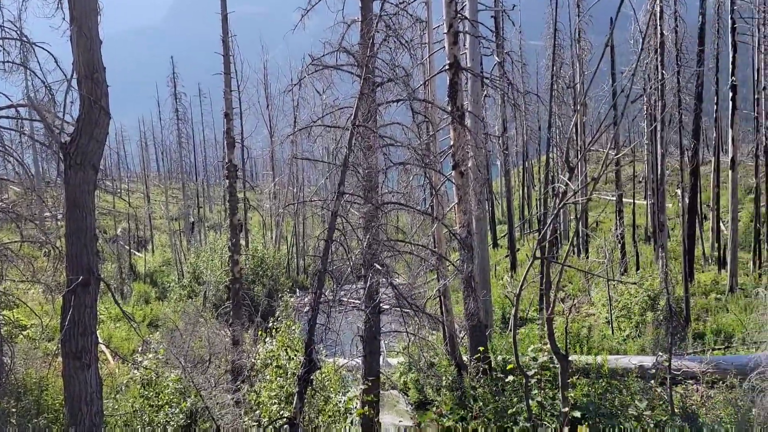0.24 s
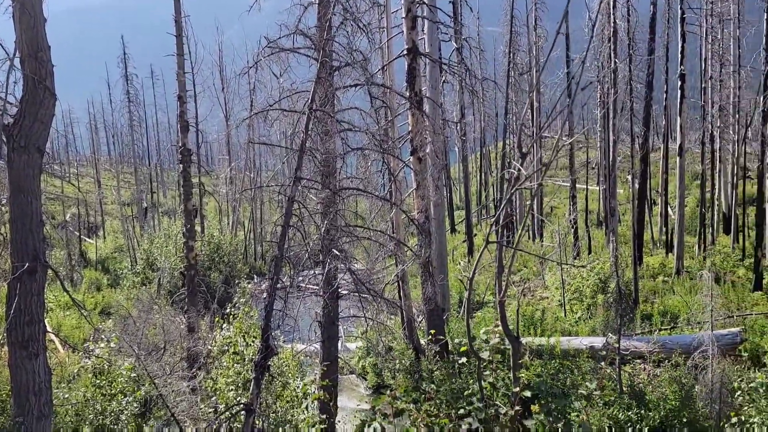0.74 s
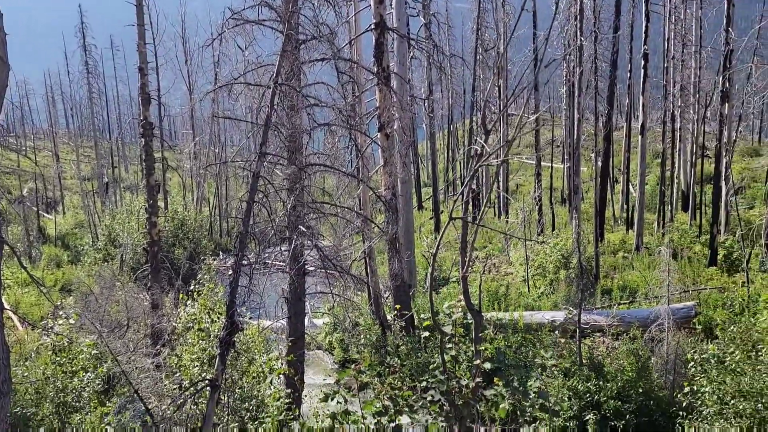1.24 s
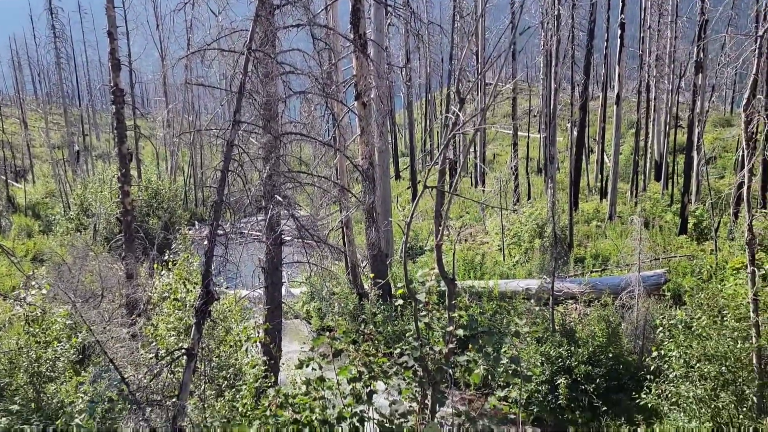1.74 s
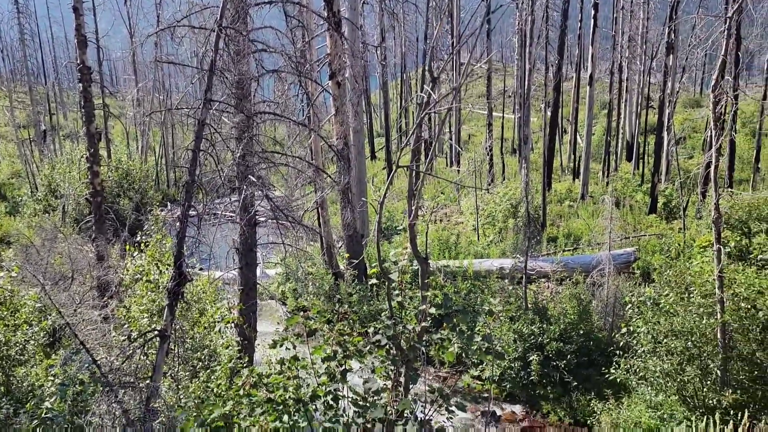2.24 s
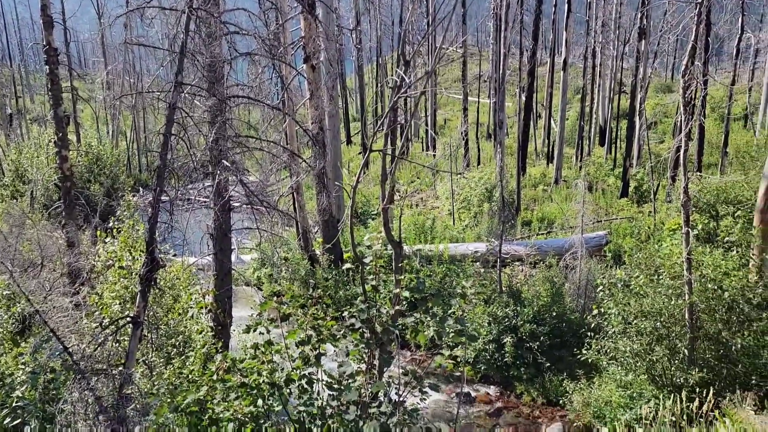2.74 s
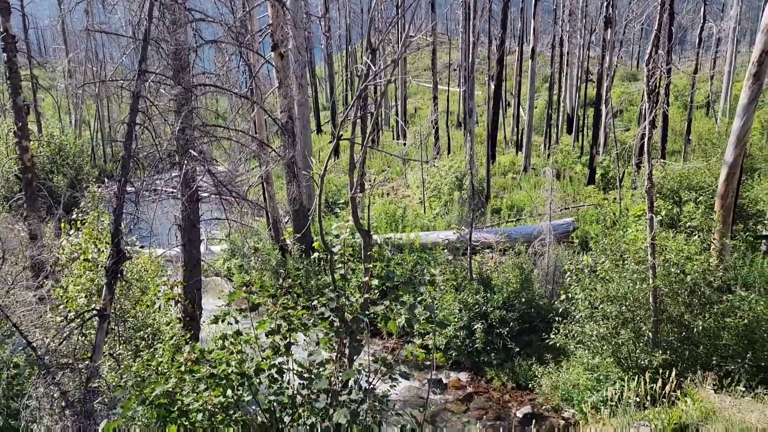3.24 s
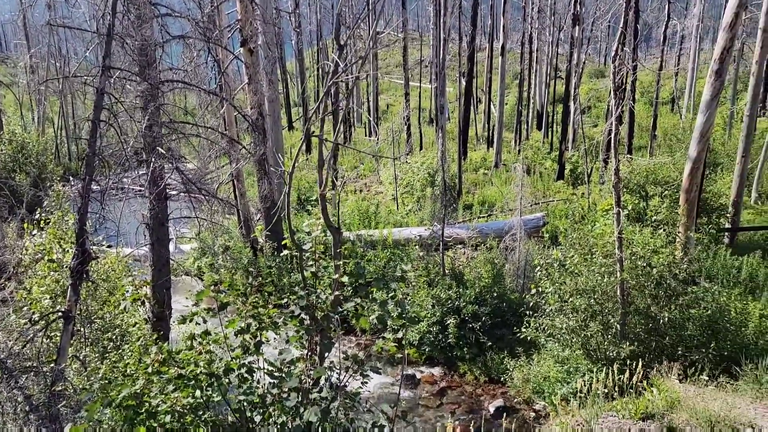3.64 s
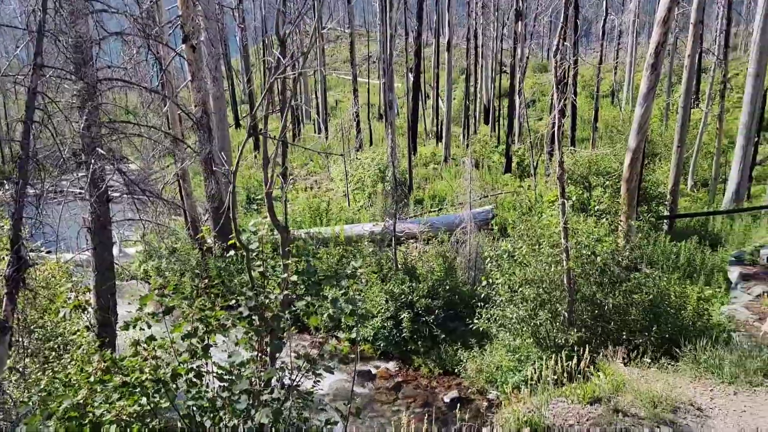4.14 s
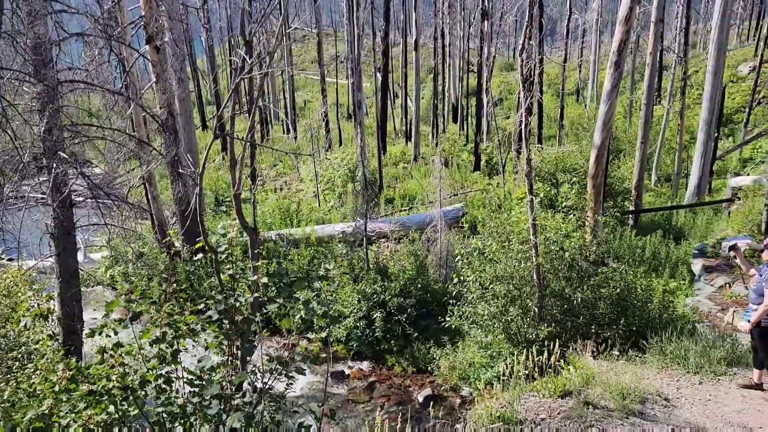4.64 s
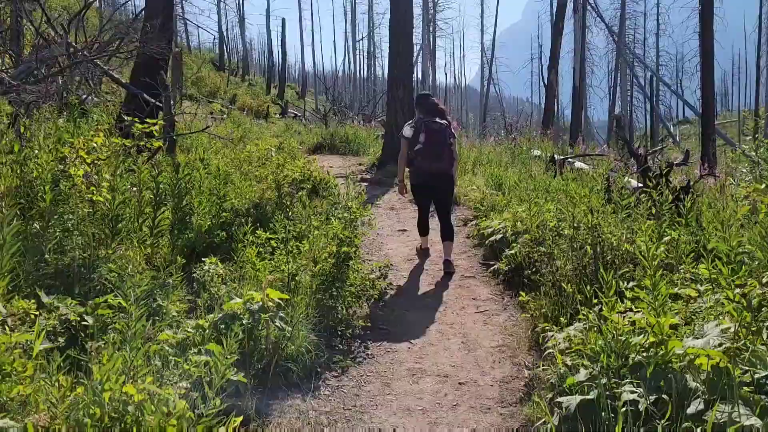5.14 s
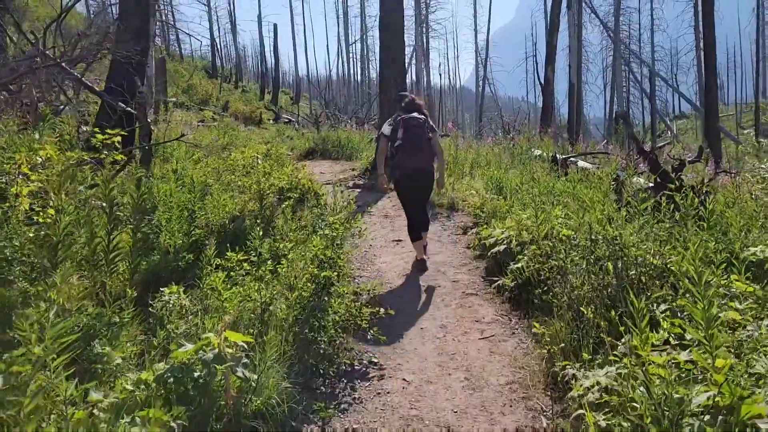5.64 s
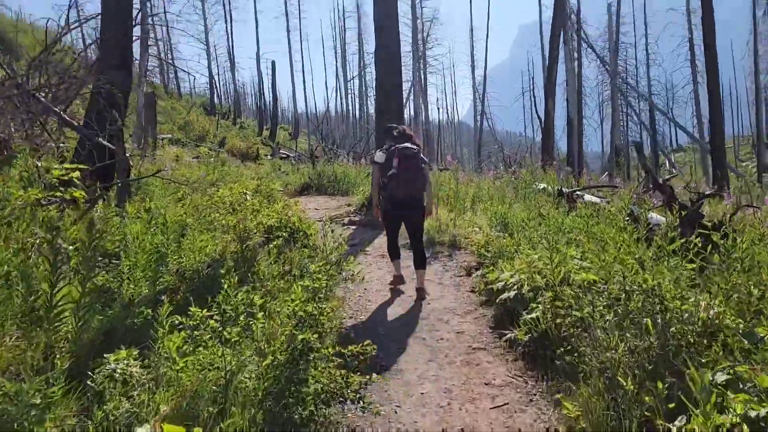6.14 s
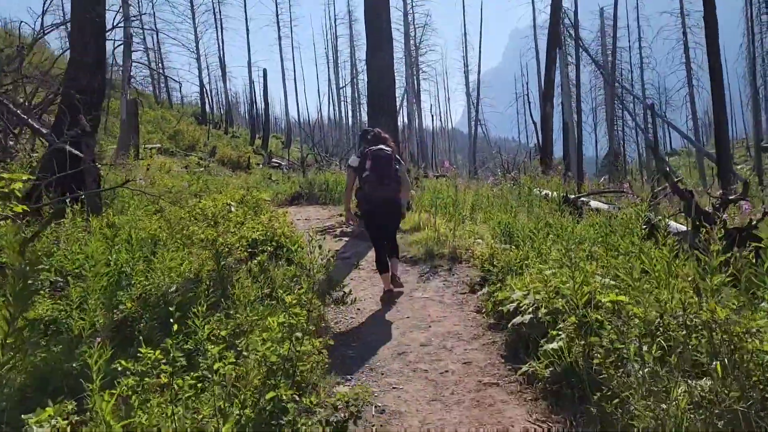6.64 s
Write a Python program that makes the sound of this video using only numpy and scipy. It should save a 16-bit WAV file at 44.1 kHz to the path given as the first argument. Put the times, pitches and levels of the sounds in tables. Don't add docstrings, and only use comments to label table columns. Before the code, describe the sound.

Outdoors, a rushing creek a few steps away fills both sides with steady churning hiss and small bubbling, over a heaving low rumble. Wind puffs buffet the handheld stereo microphone, strongest around three to four seconds. Just after five seconds it cuts to a tiny silence, then a much quieter trail: distant water, soft thumping treads, brushed leaves, dry grit cracks, a short scuff and two high insect buzzes.

```python
import sys
import numpy as np
from scipy import signal
from scipy.fft import rfft, irfft
from scipy.io import wavfile
from scipy.ndimage import uniform_filter1d

SR = 44100
rng = np.random.default_rng(int(sys.argv[2]) if len(sys.argv) > 2 else 0)


def generate_wav(sig):
    pcm = np.round(np.clip(np.atleast_2d(sig).T, -1, 1) * 32767).astype(np.int16)
    wavfile.write(sys.argv[1], SR, pcm)


def boost_factor(decibels):
    exponent = np.asarray(decibels, float) / 20
    return 10 ** exponent


N = 302967
T = np.arange(N) / SR
CREEK_END, TRAIL_START = 5.1695, 5.2203


def evened(x):
    return x / np.sqrt(np.mean(abs(x) ** 2) + 1e-20)


def read(rows, hz):
    f, *columns = np.transpose(rows)
    return [np.interp(np.log(hz + 1), np.log(f + 1), c) for c in columns]


def follow(rows, t):
    s, *columns = np.transpose(rows)
    return [np.interp(t, s, c) for c in columns]


def coloured(x, rows):
    hz = np.fft.rfftfreq(x.shape[-1], 1 / SR)
    return evened(irfft(rfft(x) * boost_factor(read(rows, hz)[0]), x.shape[-1]))


def resonate(x, hz, width_hz):
    turn = np.exp(2j * np.pi * np.cumsum(hz * np.ones(len(x))) / SR)
    r = np.exp(-np.pi * width_hz / SR)
    return 2 * (turn * signal.lfilter([1 - r], [1, -r], x / turn)).real


def patches(x, bins, frames):
    return evened(uniform_filter1d(uniform_filter1d(x, size=bins, axis=0), size=frames, axis=1))


def swells(rows, length_s, t):
    db = sum(rise_db * np.exp(-((t - s) / length_s) ** 2) for s, rise_db in rows)
    return db - db.mean()


def bubbles(per_s, spread_db, cycles, rise):
    out = np.zeros((2, N))
    place, size = rng.random((2, 16, 2, 4000)), rng.exponential(1, (16, 2, 4000))
    for hz, (at, keep), big in zip(np.geomspace(180, 9000, num=16), place.swapaxes(0, 1), size):
        u = np.arange(int(30 * SR / hz)) * hz / SR
        ring = np.sin(2 * np.pi * u * (1 + rise * u)) * np.exp(-u / cycles) * (1 - np.exp(-2 * u))
        kept = keep < per_s * np.sqrt(hz / 1000) * N / SR / at.shape[1]
        born = np.zeros((2, N))
        np.put_along_axis(born, (at * N).astype(int), kept * boost_factor(spread_db * np.minimum(big, 4)), 1)
        out += signal.oaconvolve(born, ring[None], axes=1)[:, :N]
    return out


def water(colour, ports, flow, layers_hz, turn, grains, start, share, patchy_db, surge_db, gaps, gaps_hz):
    hz, t, churn = signal.stft(rng.standard_normal(grains.shape), SR, nperseg=2048, noverlap=1536)
    t = t + start
    pops = signal.stft(grains, SR, nperseg=2048, noverlap=1536)[2]
    pops = pops / np.sqrt(uniform_filter1d((abs(pops) ** 2).mean((0, 2)), size=9))[:, None]
    share = np.clip(share, 0, 1)
    near, other = np.sqrt(1 - share) * churn + np.sqrt(share * np.mean(abs(churn) ** 2)) * pops

    bass = evened(abs(near[:8]).mean(0))
    near = near / bass ** (.7 * np.clip(1.5 - hz / 130, 0, 1))[:, None]

    same, ahead = read(ports, hz)
    alike = ((same - 1j * ahead) / np.maximum(np.hypot(same, ahead), 1))[:, None]
    pan_db, lead_us = follow(turn, t)
    later = np.exp(-2j * np.pi * np.outer(hz, lead_us) / 10 ** 6)
    right = alike * later * near + np.sqrt(1 - abs(alike) ** 2 + 1e-9) * other
    pair = np.array([near, right])

    weights = np.array(read(np.c_[layers_hz, np.eye(4)], hz))
    field_db = weights.T @ flow(t)
    chance = rng.standard_normal((len(t), len(hz))).T
    field_db += patchy_db * patches(chance, 24, 7)
    field_db += surge_db * evened(uniform_filter1d(rng.standard_normal(len(t)), size=8))
    strips = patches(chance[::-1], 11, 6)
    field_db -= 30 * np.clip(4 * (gaps - strips), 0, 1) * (hz > gaps_hz)[:, None]
    turn_db = np.array([.5, -.5])[:, None, None] * pan_db
    gain = boost_factor(np.array(read(colour, hz))[..., None] + field_db + turn_db) * np.sqrt(SR / 2)
    return signal.istft(pair * gain, SR, nperseg=2048, noverlap=1536)[1][:, :grains.shape[1]]


# time in seconds, rumble in dB over its mean.
CREEK_HEAVES = [(0.48, 4), (0.6, 0), (0.85, 3), (1.07, -2.5), (1.16, 0.5), (1.52, 3.5), (1.62, -5),
                (2.38, 1), (2.52, 2), (3.18, -3), (3.58, 5.5), (3.83, -3), (3.95, 1), (4.8, -4), (4.91, 5),
                (4.97, -7), (5.08, 4.5), (5.15, -10)]
# rumble, body, splash, fizz. Drift in dB per second; share of each heave.
CREEK_DRIFT_DB_PER_S = [-0.13, 0.25, -0.066, 0.13]
CREEK_HEAVE_SHARE = [0.75, 0.037, .03, .01]


def creek_flow(t):
    drift = np.outer(CREEK_DRIFT_DB_PER_S, t - t.mean())
    return drift + np.outer(CREEK_HEAVE_SHARE, swells(CREEK_HEAVES, 0.073, t))


# frequency in Hz, left port in dB, right port in dB.
CREEK_COLOUR = [(25, -63, -65), (67, -50.5, -49), (152, -60, -58.5), (402, -57.7, -53.5), (440, -62, -58.5),
                (638, -59.5, -60.5), (780, -56, -59), (1046, -59, -57), (1590, -63.5, -65.5),
                (2750, -66.5, -66), (4060, -72.5, -66.5), (6800, -77.5, -72), (9770, -84, -86.5),
                (13100, -84, -84)]
# frequency in Hz, in-phase part, quarter-turn part [-1 to 1].
CREEK_PORTS = [(60, 0.99, 0.12), (234, 0.88, -0.14), (380, 0.54, 0.73), (453, -0.21, 0.24),
               (560, -0.72, 0.62), (682, 0.036, 0.79), (820, 0.77, -0.037), (940, 0.068, 0.45),
               (1140, -0.18, 0.53), (1400, -0.54, 0.46), (1810, -0.081, 0.8), (2300, -0.44, -0.35),
               (2770, 0.19, -0.12), (5100, -0.18, 0.06), (7000, 0.11, -0.012)]
CREEK_LAYERS_HZ = [100, 400, 1500, 3500]
# time in seconds, left over right in dB, extra lead of left port in microseconds.
CREEK_TURN = [
    (0, 0, -34),
    (1.7, 0.1, -38),
    (3.4, 0.1, 15),
    (5.17, 1, 35),
]


def creek(grains):
    return water(CREEK_COLOUR, CREEK_PORTS, creek_flow, CREEK_LAYERS_HZ, CREEK_TURN, grains, 0,
                 share=0.25, patchy_db=0.55, surge_db=0.33, gaps=-1.13, gaps_hz=8100)


# time in seconds, peak in dB, length in seconds.
GUSTS = [(0.62, -52, .3), (1.5, -58, .15), (1.98, -43, 0.054), (2.5, -48, 0.054), (2.71, -46, .07),
         (2.88, -52, .08), (3.012, -36, 0.062), (3.19, -32, 0.056), (3.31, -43, 0.077), (3.44, -38, 0.064),
         (3.63, -43, .08), (3.918, -36, 0.045), (4.07, -40, 0.11), (4.27, -45, .1), (4.45, -43, 0.077),
         (4.7, -44, .08), (4.88, -54, .1), (5.05, -42, 0.079)]
# frequency in Hz, level in dB.
WIND = [(15, -3), (45, 0), (70, -1), (100, -8), (150, -22), (300, -50)]


def wind():
    calm_db = -61
    lumps = uniform_filter1d(rng.standard_normal((2, N)), size=2500)
    puffs = boost_factor(calm_db) + sum(boost_factor(db) * np.exp(-((T - s) / length) ** 2) for s, db, length in GUSTS)
    return coloured(rng.standard_normal((2, N)), WIND) * puffs * boost_factor(2 + 1.0 * evened(lumps))


# time in seconds, peak in dB, main ring in Hz, crunch in dB,
# left over right in dB.
STEPS = [(5.556, -40, 1300, -9, -2), (5.567, -31, 1500, -13, -2), (5.600, -31, 900, -17, -2.5),
         (5.612, -41, 2100, -6, -2), (6.113, -43, 2600, -7, -2), (6.158, -32.5, 900, -12, -3),
         (6.610, -36, 750, -10, 0), (6.614, -36, 1250, -7, -3), (6.622, -38, 600, -12, -3),
         (6.635, -34, 2370, -9, -6), (6.638, -33, 520, -10.5, -4), (6.636, -38, 1400, -22, 0),
         (6.691, -44, 1300, -4, -4), (6.826, -41, 2300, -9, -1)]
# frequency in Hz, level in dB.
GRIT = [(100, -22), (500, 4), (1400, -2), (2500, -6), (4000, -15), (9000, -27)]


def steps():
    out, t = np.zeros((2, N + SR)), np.arange(-1500, 3000) / SR
    for s, db, hz, crunch_db, pan_db in STEPS:
        grains = coloured(rng.standard_normal(len(t)) ** 3, GRIT)
        tick = coloured((t == 0) * 1., GRIT) / 30
        crack = np.exp(-abs(t) / 0.0016) * ((t > 0) * np.sin(2 * np.pi * hz * t) - 0.59 * tick)
        crunch = boost_factor(crunch_db) * grains * np.exp(-(t / 0.0059) ** 2)
        gain = boost_factor(db + pan_db * np.array([[.5], [-.5]]))
        out[:, round(s * SR) - 1500:][:, :len(t)] += gain * (crack + crunch)
    return out[:, :N]


# time in seconds, level in dB, hiss centre in Hz.
SCUFF = [
    (5.88, -75, 2200),
    (5.98, -66, 2450),
    (6.1, -56, 2750),
    (6.15, -60, 2950),
    (6.2, -78, 3000),
]


def scuff():
    db, hz = follow(SCUFF, T)
    drag = evened(resonate(resonate(rng.standard_normal(N), hz, 500), hz, 500))
    return boost_factor(db + np.array([[-2.5], [2.5]])) * drag * (T > SCUFF[0][0]) * (T < SCUFF[-1][0])


# time in seconds, low buzz in dB, high buzz in dB.
BUZZ = [
    (5.8, -73, -71),
    (5.838, -62, -76),
    (5.87, -75, -69),
    (5.96, -65, -67),
    (6.32, -57, -59),
    (6.386, -53.5, -64),
    (6.518, -60, -58.5),
    (6.618, -59, -61),
    (6.87, -65, -62),
]


def buzz(db, hz, pan_db, lag, width_hz, rough):
    strokes_per_s = 121.3
    wander = evened(uniform_filter1d(rng.standard_normal(N), size=3000))
    turns = np.cumsum(strokes_per_s * (1 + 0.0083 * wander)) / SR
    stroke = np.exp(-(((turns % 1) - .5) / 0.17) ** 2)
    strength = boost_factor(1.0 * rng.standard_normal(N))[turns.astype(int)]
    scrape = resonate(resonate(rng.standard_normal(N), hz, width_hz), hz, width_hz)
    tone = np.sqrt(2) * np.sin(2 * np.pi * np.cumsum(hz * np.ones(N)) / SR)
    sound = evened(stroke * strength * (rough * evened(scrape) + (1 - rough) * tone))
    sound *= boost_factor(db) * np.clip((T - BUZZ[0][0]) / 0.09, 0, 1)
    return np.array([sound * boost_factor(pan_db / 2), np.roll(sound, lag) / boost_factor(pan_db / 2)])


# time in seconds, resonance in Hz.
LOW_PITCH = [(5.8, 7210), (6.4, 7130), (6.46, 7200), (6.6, 7100), (6.74, 7200), (6.8, 7370), (6.87, 7300)]
# time in seconds, resonance in Hz.
HIGH_PITCH = [(5.95, 9210), (6.58, 9160), (6.86, 9300)]


def insects():
    low_db, high_db = follow(BUZZ, T)
    low = buzz(low_db, follow(LOW_PITCH, T)[0], pan_db=-4, lag=0, width_hz=300, rough=.55)
    high = buzz(high_db, follow(HIGH_PITCH, T)[0], pan_db=6, lag=5, width_hz=300, rough=.6)
    return low + high


# time in seconds, rumble in dB over the lulls.
TREADS = [(5.28, 10), (5.37, 7), (5.506, 9), (5.58, 6), (5.698, 15), (5.84, 9), (5.984, 11.5), (6.13, 6),
          (6.184, 10), (6.275, 5), (6.38, 2), (6.47, 0), (6.63, 2), (6.75, 6)]
# time in seconds, level in dB over the air.
RUSTLES = [
    (5.27, 2),
    (5.638, 3),
    (6.066, 3),
]
# rumble, body, splash, fizz. Drift in dB per second; share of each tread; share of each rustle.
TRAIL_DRIFT_DB_PER_S = [0.5, 0.4, -1.6, 3.5]
TREAD_SHARE = [0.51, 0.01, -0.12, -.15]
RUSTLE_SHARE = [.01, .55, .6, .7]


def trail_flow(t):
    drift = np.outer(TRAIL_DRIFT_DB_PER_S, t - t.mean())
    thumps = np.outer(TREAD_SHARE, swells(TREADS, 0.031, t))
    return drift + thumps + np.outer(RUSTLE_SHARE, swells(RUSTLES, 0.072, t))


# frequency in Hz, left port in dB, right port in dB.
TRAIL_COLOUR = [(25, -74, -71), (69.6, -59, -57), (130, -67.5, -68.5), (250, -78.5, -74), (400, -76.5, -72),
                (550, -73.5, -71.5), (900, -74.5, -74), (1400, -77.5, -74.5), (2200, -83, -79.5),
                (3200, -85.5, -80.5), (5000, -93.5, -87.5), (8100, -89, -88.5), (11200, -100, -99),
                (15000, -102, -101)]
# frequency in Hz, in-phase part, quarter-turn part [about -1 to 1].
TRAIL_PORTS = [(60, 0.98, -0.12), (150, 0.97, -0.12), (250, 0.53, -0.26), (400, -0.11, -1.2),
               (553, -0.5, -0.13), (800, -0.83, -0.23), (1090, -0.79, 0.24), (1500, -0.74, 0.31),
               (2100, -0.079, 0.023), (2860, -0.33, 0.13), (3560, 0.12, -0.0089), (4500, -0.13, -0.18),
               (7000, 0.014, 0.14)]
TRAIL_LAYERS_HZ = [100, 300, 4000, 12000]
# time in seconds, left over right in dB, extra lead of left port in microseconds.
TRAIL_TURN = [
    (5.23, 0.089, -5),
    (6.87, -.1, 5),
]


def trail_air(grains):
    return water(TRAIL_COLOUR, TRAIL_PORTS, trail_flow, TRAIL_LAYERS_HZ, TRAIL_TURN, grains, CREEK_END,
                 share=0.13, patchy_db=.9, surge_db=0.94, gaps=-0.39, gaps_hz=9900)


def start_pop():
    return -boost_factor(-39) * (T > TRAIL_START) * np.exp(-abs(T - TRAIL_START) / .003)


def scene():
    grains = bubbles(per_s=120, spread_db=2.0, cycles=3.46, rise=0.014)
    cut = round(CREEK_END * SR)
    waters = np.c_[creek(grains[:, :cut]), trail_air(grains[:, cut:])]
    heard = waters + np.where(T < CREEK_END, wind(), steps() + scuff() + insects())
    heard = signal.sosfilt(signal.butter(2, 38, "high", fs=SR, output="sos"), heard)
    return (heard + start_pop()) * ((T < CREEK_END) | (T > TRAIL_START))


def band_limit(x):
    return signal.sosfilt(signal.butter(12, 15670, fs=SR, output="sos"), x)


def record(dry):
    edge = signal.firwin(301, 15290, window=("kaiser", 7), fs=SR)
    mix = signal.oaconvolve(dry, edge[None], "same", axes=1)
    return band_limit(mix)


dry = scene()
out = record(dry)
generate_wav(out)
```